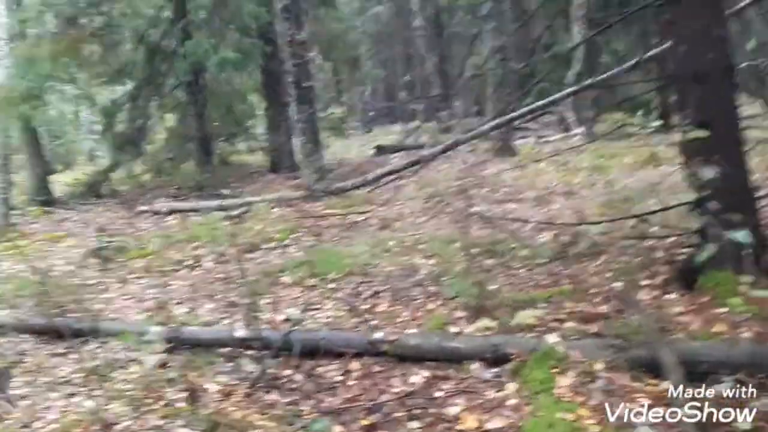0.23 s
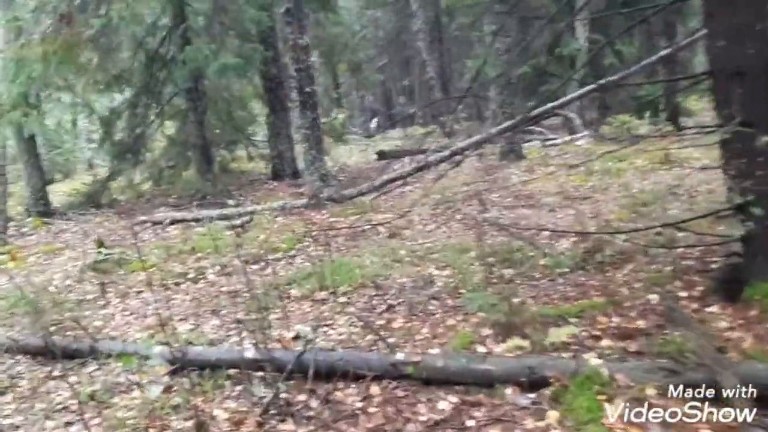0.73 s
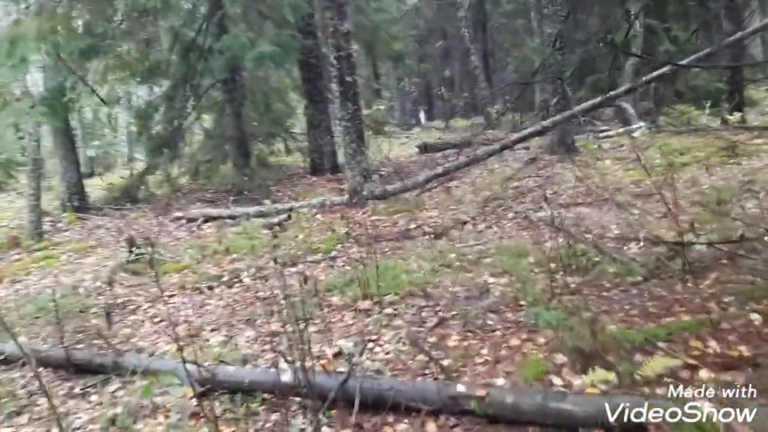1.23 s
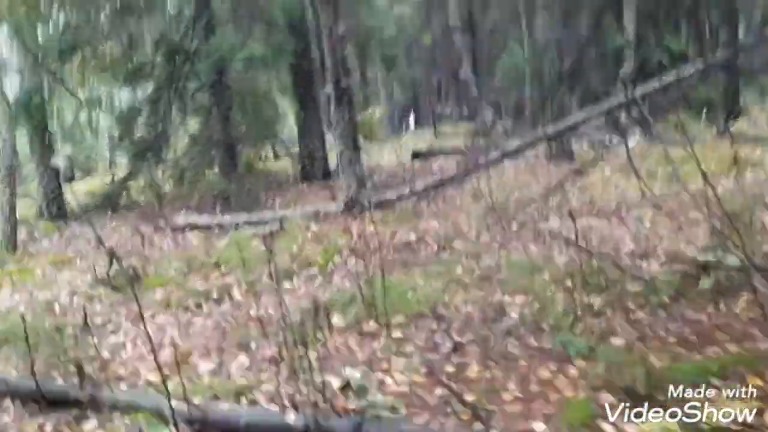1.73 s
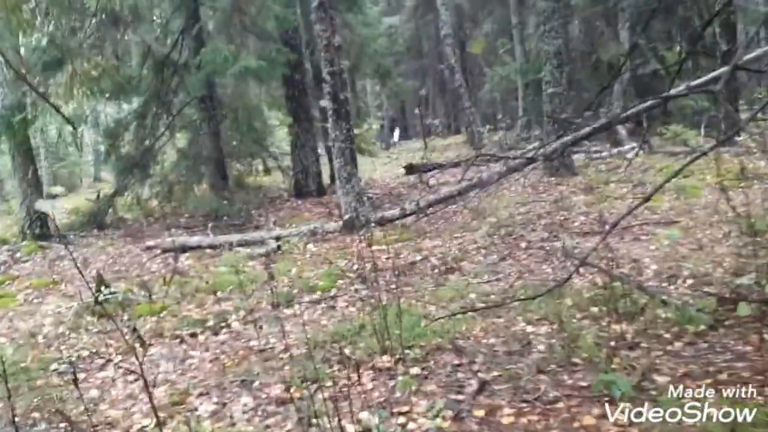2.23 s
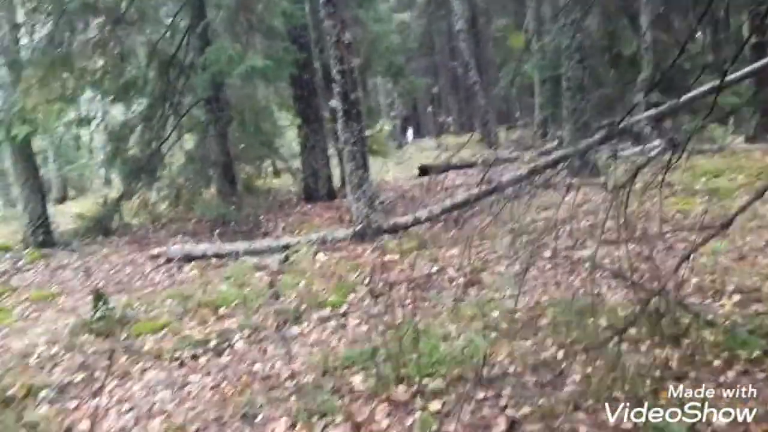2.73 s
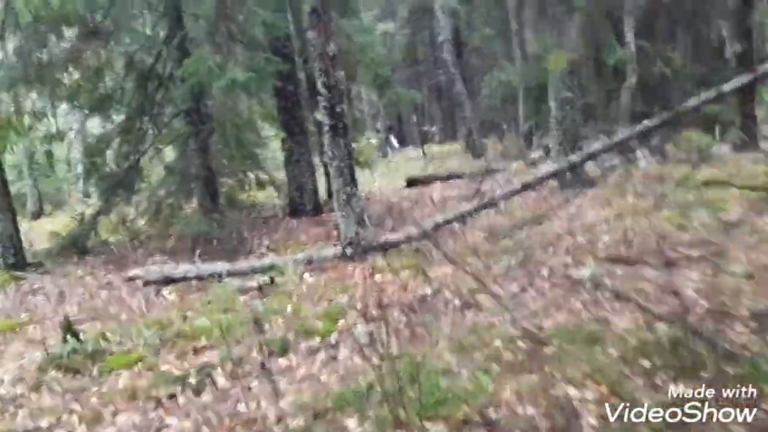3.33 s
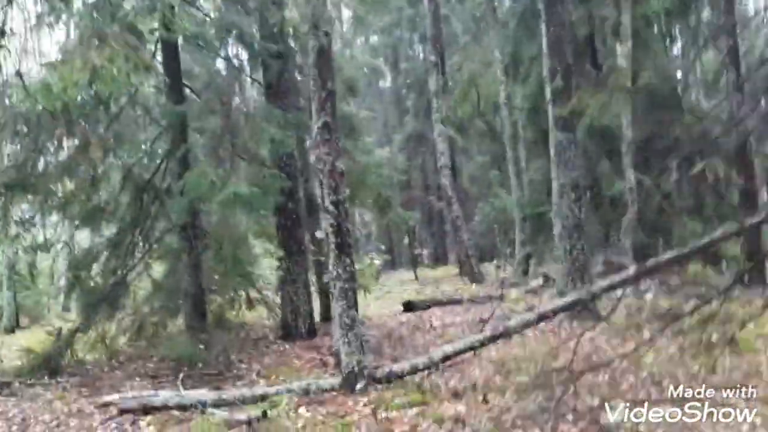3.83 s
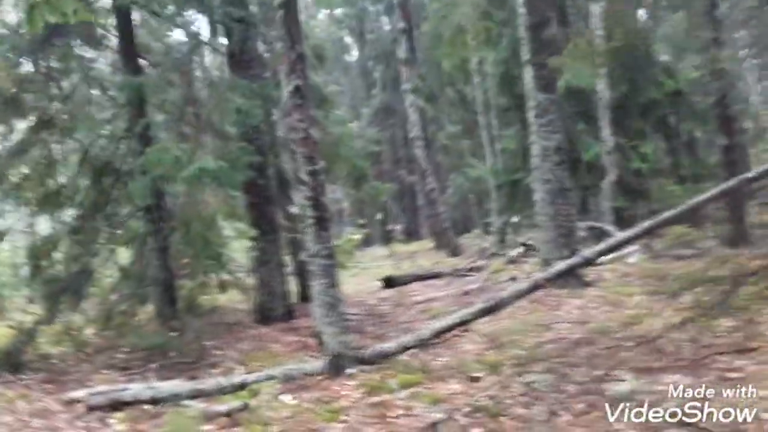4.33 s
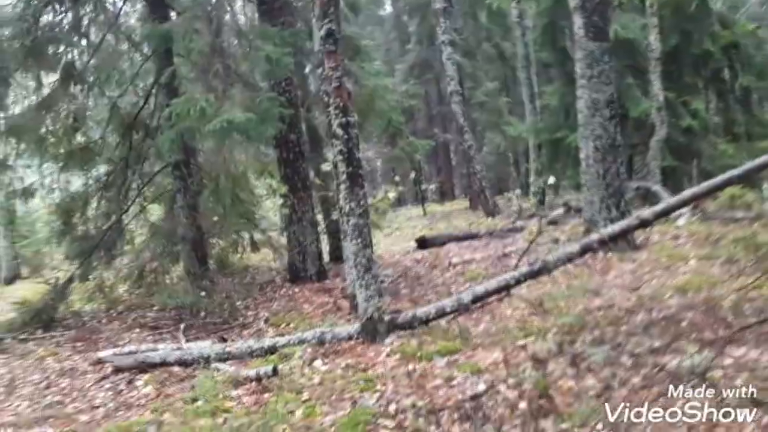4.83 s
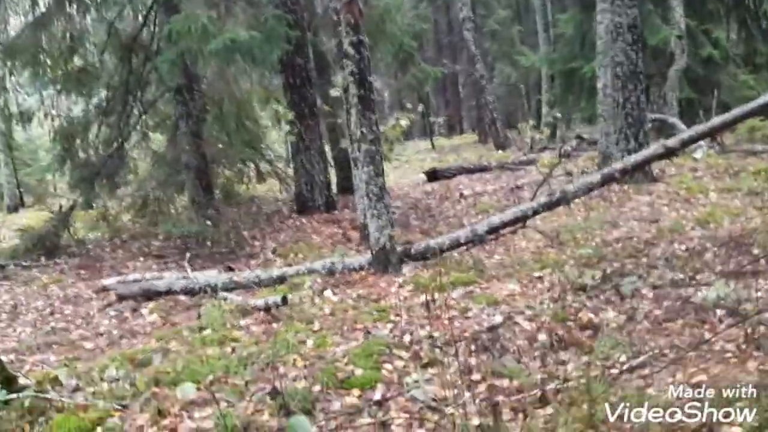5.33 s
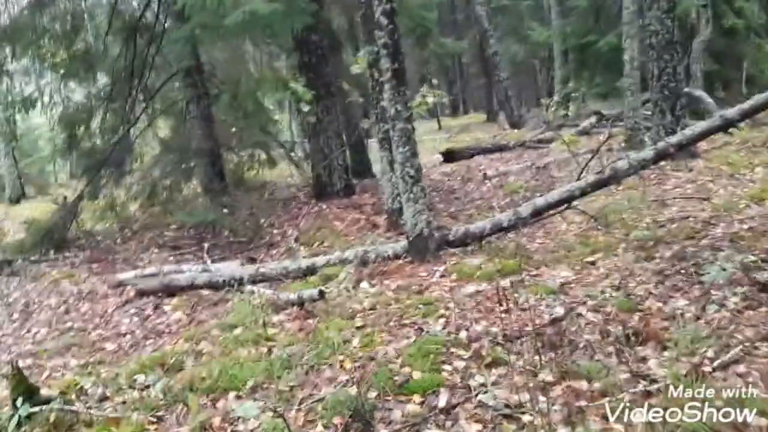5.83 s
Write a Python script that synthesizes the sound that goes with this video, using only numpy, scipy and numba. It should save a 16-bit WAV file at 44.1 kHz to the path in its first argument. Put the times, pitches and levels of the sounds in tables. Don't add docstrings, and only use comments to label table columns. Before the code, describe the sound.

A person walks through dry leaf litter in a still forest, heard close on a handheld stereo phone. A leaf swish and soft air puffs open it, then uneven crunches with snapping twigs, ticking stalks and dull thuds underfoot. It thins near three seconds, a very loud twig crack comes past four, and a heavy rustle swells near the end.

```python
import sys
import numpy as np
from scipy import signal
from scipy.fft import rfft, irfft
from scipy.io import wavfile
from scipy.ndimage import uniform_filter1d, map_coordinates
from numba import njit

SR = 44100
rng = np.random.default_rng(int(sys.argv[2]) if len(sys.argv) > 2 else 0)


def to_linear_factor(level_db):
    exponent = np.asarray(level_db, float) / 20
    return 10 ** exponent


def materialize(psi):
    bounded = np.clip(np.atleast_2d(psi).T, -1, 1)
    quanta = np.round(bounded * 32767).astype(np.int16)
    wavfile.write(sys.argv[1], SR, quanta)


N = 267819

LEAF_HZ = [900, 2500, 6000, 12500]
LEAF_DB = [-4, 1.8, -2.5, 0.4]
LEAF_STEEP = [1.2518, 1.05, 1.0493, 0.95]
# start_s, level_db, fall_s (per 20 dB), tilt_db_per_octave (towards thin leaves)
TREADS = [(0.28, -55.5, .33, -.6), (0.665, -65, 0.2817, -.6), (0.771, -54.5, 0.1265, 2),
          (0.886, -57.5, 0.3077, 1.5), (1.317, -58.5, 0.1645, 1.5), (1.619, -57.5, 0.0833, 2.5),
          (1.7, -54.5, 0.4122, 0.5), (2.367, -72, .1, -1.5), (2.472, -64, 0.2404, 1.5),
          (2.93, -69, .06, 4.5), (2.997, -68, .08, 4), (3.075, -68, .05, 4.5), (3.24, -58.5, .8, 2),
          (4.045, -58, .2, 2.5), (4.115, -59, 0.2981, -3.5), (4.328, -55, .2, 2.5), (5.375, -54, .07, 2)]
# loudest_s, level_db, rise_s, fall_s (both per 20 dB), tilt_db_per_octave
SWEEPS = [(0.02, -57.5, 0.16, .17, -.6), (0.49, -64, .5, .055, -2.5), (1.47, -75, .3, .4, 5),
          (1.056, -59.5, .5, 0.1406, 1.5), (2.2, -63, .45, .09, -1.5), (2.546, -59, 0.1258, 0.2373, 0),
          (2.84, -72, .45, 1.2, 4.5), (3.628, -52.5, 0.2238, 0.3812, 1.5), (3.89, -57, 0.1793, .3, -1.5),
          (3.95, -62, .4, .04, 2.5), (4.262, -54.5, 0.2495, 0.0826, 2), (4.44, -61, 0.7846, .33, .6),
          (4.885, -64, .45, .14, 1.5), (5.19, -63, .13, .45, -.9), (5.32, -60, .15, .3, -2.5),
          (5.54, -49, .2, .25, .8), (5.675, -45.5, .3, .16, -1.2), (5.775, -51, 0.9784, .075, .4),
          (6.01, -58, .08, .9, -1.1)]
# (both per 20 dB, sign ignored)
WEIGHT = [(0.65, -52, .008, .15), (0.944, -58, 0.2591, -0.0222), (1.31, -61, .03, .2),
          (1.69, -49, .12, .18), (1.83, -53, .08, .3), (2.07, -57, .15, .2), (4.85, -70, .5, .2),
          (2.82, -64, .25, 1.5), (3.063, -62, .4, .17), (3.265, -61, .02, .25),
          (3.522, -53, 0.1352, 0.1925), (4.105, -54, .02, .3), (4.414, -56.5, 0.5132, -0.0572),
          (5.735, -48, 0.3291, 0.0578), (.03, -50, .03, .08), (1.49, -71, .1, .1), (3.9, -60, .15, .1),
          (5.38, -62, .2, .3), (6.07, -60, .1, .1)]
# pitch_hz, width_hz, share (0 to 1)
BED_MODES = [(318, 50, 1), (480, 300, .6), (170, 150, .27)]
# loudest_s, level_db, swell_s (rise and fall per 20 dB)
PUFFS = [(0.03, -60.5, 0.1261), (0.104, -45.5, 0.0302), (0.15, -40.5, 0.0315), (0.229, -53, 0.0385),
         (0.66, -68, 0.0274), (0.864, -73, 0.1265), (1.01, -63, .04), (1.131, -46, .018),
         (1.744, -49.5, 0.0737), (1.864, -56, 0.1192), (1.96, -68.5, 0.2106), (2.147, -67.5, 0.0504),
         (1.3, -70, .1), (2.41, -61, .12), (2.685, -75, 0.0287), (3.48, -61, 0.1074), (3.62, -65.5, 0.2794),
         (5.45, -71, .3), (5.7, -64, .15), (5.813, -43, 0.0283), (2.08, -64, .03), (2.65, -70, .03),
         (3.4, -68, .05), (4.52, -77, .05)]
# start_s, peak_db, colour_hz, left_minus_right_db
FLICKS = [(.0144, -38, 14300, 2), (1.0156, -45, 2330, -5), (1.0984, -46, 7920, 1), (1.264, -46, 1500, 0),
          (1.2755, -42, 2370, -2), (1.288, -46, 2500, 0), (1.6207, -42, 12800, 3), (1.6636, -44, 2830, -1),
          (1.669, -42, 13000, 3), (1.6776, -38, 15000, 1), (1.812, -44, 1500, 0), (1.9729, -46, 1500, 0),
          (2.1226, -44, 11000, 5), (2.7891, -44, 12000, 4), (2.866, -52, 13000, 2), (2.8908, -51, 12900, 3),
          (3.5404, -43, 12400, 5), (3.5538, -43, 2030, 0), (3.8856, -41, 2130, -2), (4.117, -40, 1100, 0),
          (4.205, -40, 5000, 2), (4.316, -36, 14000, 2), (4.3854, -40, 13000, 1), (4.4468, -44, 1160, 0),
          (4.5341, -47, 3120, -2), (5.3742, -36, 7950, -5), (5.383, -34, 8000, -5), (5.677, -31, 6000, -4),
          (5.698, -30, 7900, -6), (5.702, -34, 5000, -5), (5.7598, -31, 1500, 0), (5.7603, -34, 9000, 2),
          (.8944, -34, 6800, 0)]
# start_s, peak_db, colour_hz, left_minus_right_db, time_to_peak_s
RIPS = [(.7632, -24, 6000, 0, .0014), (.7638, -25, 12500, 8, .0012), (.7655, -32, 2000, 0, .0015),
        (3.228, -44, 13500, 3, .012), (4.03, -48, 5500, 0, .006), (4.068, -44, 6500, 0, .005),
        (4.211, -40, 6000, 2, .003), (4.2587, -31, 5000, 2, .003), (5.297, -40, 12000, -2, .002),
        (5.361, -34, 5500, -5, .002), (5.44, -42, 5000, -3, .006), (5.741, -35, 7500, -4, .005),
        (5.681, -29, 15000, -8, .006)]
# start_s, peak_db, colour_hz, crack_db, left_minus_right_db
TWIGS = [(0.0272, -30.5, 3166, -5, 8), (0.3055, -31, 5519, -29.5, -19.5), (0.7659, -19, 4893, -1.1, 8),
         (0.859, -26.5, 6136, -4, 0.286), (0.8629, -28.5, 2212, -1.5, 2.5),
         (1.2305, -27, 2306, -25, 0.2911), (1.2975, -15, 4525, -6, 3), (1.3014, -29, 5497, -0.443, 0.2832),
         (1.6822, -17.5, 3200, 4, 9), (1.7048, -20.5, 4971, 5.5, 4), (1.7078, -22, 5520, -17, -5),
         (2.5432, -21.5, 2661, -26, -0.84), (2.71, -24, 3100, -17, 1), (2.7262, -25.5, 2900, -16, -3.5),
         (3.576, -24, 2572, 5, 10), (3.6019, -25.5, 5650, -0.9086, 8), (3.6063, -35, 4940, 11, 9),
         (3.6495, -23, 5840, 4.5, 5.5), (4.2, -25.5, 5237, -3.5, 6), (4.2486, -27.5, 4593, -8, 1.7631),
         (4.2593, -21, 4231, -7.5, 3), (4.3251, -6, 4730, -0.2984, 0.49), (5.7344, -21, 1519, -27, -16),
         (5.7636, -23, 4828, -6.5, 5)]
# start_s, peak_db, colour_hz, left_minus_right_db
STALKS = [(0.383, -41, 1478, -11.5), (0.4038, -34, 927.5, 3), (0.4425, -41, 3082, -4.5),
          (0.4765, -43.5, 1138, 7.5), (0.497, -38.5, 962.6, -2.5), (0.543, -47.5, 1158, -1.8969),
          (0.6466, -42.5, 1021, 2), (0.7104, -36.5, 909.6, 7.5), (0.8356, -34.5, 5833, -0.5),
          (0.8954, -33.5, 6810, -4), (0.901, -29.5, 5850, 0.5), (1.1276, -38.5, 5367, -12),
          (1.2109, -39, 3006, -5.5), (1.2461, -33, 2459, -0.1677), (1.3527, -46.5, 929, 8.5),
          (1.6107, -37.5, 4610, -6.5), (1.6147, -35, 4910, 9.5), (1.91, -34.5, 1637, 2),
          (2.033, -31.5, 4062, 5), (2.523, -43.5, 2660, 2), (2.5658, -31.5, 2279, 0),
          (2.7495, -43, 2760, -5), (3.1385, -49, 2272, 10), (3.463, -35.5, 1804, -15.5),
          (4.301, -39.5, 2856, -8.5), (4.4066, -31.5, 3700, 6.5), (4.4181, -31.5, 2637, 3.5),
          (4.5891, -40, 3133, 8.5), (5.463, -32, 5678, -3), (5.5218, -29, 1787, 0.7655)]
# start_s, peak_db, colour_hz, left_minus_right_db
SPLINTERS = [(0.424, -44, 900, 1.1), (0.4655, -39, 1018, -2.8872), (0.5125, -41, 1300, 3),
             (0.714, -41, 1720, -7), (0.6504, -43, 829, -12.5), (0.939, -30.5, 4128, 9.5),
             (0.9827, -28.5, 2711, 3.5), (1.7926, -35, 4337, 8.5), (2.5022, -35.5, 2560, -3.1826),
             (2.7999, -42.5, 2884, 3.5), (3.066, -42, 5590, -6.5), (3.2413, -36.5, 6054, 5.5),
             (3.449, -35, 4505, 2), (3.6298, -27.5, 6000, 12), (4.1346, -37, 1930, 0.2024),
             (4.1538, -39, 1330, -1.3616), (4.1785, -36.5, 2000, 0.1417), (4.307, -37.5, 2850, 11.5),
             (4.4946, -50, 3230, -9), (5.2648, -38, 2441, -5.5), (5.2975, -31, 3731, -4),
             (5.9011, -44, 5400, 3)]
# start_s, peak_db, pitch_hz
THUDS = [(0.029, -38, 313.4), (0.403, -36, 593.1), (0.482, -35, 633.4), (0.65, -34, 477.8),
         (0.708, -39, 401.4), (0.861, -38, 649.7), (1.301, -39, 355.2), (1.649, -41, 199.3),
         (1.683, -40, 305.2), (1.713, -40.5, 315.1), (1.976, -45, 366.3), (2.394, -47.5, 194.5),
         (3.465, -41, 354), (3.525, -42, 290.2), (3.649, -34.5, 322), (4.106, -35.5, 419.8),
         (4.136, -40, 320), (4.155, -40.5, 316.6), (4.217, -40, 398.6), (4.271, -42.5, 498.8),
         (4.326, -34.5, 358.7), (4.406, -35, 421.3), (5.39, -39.5, 589.7), (5.524, -36.5, 532),
         (5.616, -44, 328.1), (5.667, -38, 445.6), (5.677, -36, 411.5), (5.697, -41.5, 369.5),
         (5.735, -34, 322), (5.761, -34.5, 505.8)]
# start_s, peak_db, pitch_hz
HEELS = [
    (.648, -45, 140),
    (.785, -46, 300),
    (.985, -48, 190),
    (1.3, -50, 130),
    (2.65, -56, 140),
    (1.655, -44, 420),
    (4.118, -41, 480),
]
# start_s, length_s, pitch_hz, level_db
SCUFFS = [
    (0.26, 0.1338, 1022, -63.5),
    (2.075, .14, 1000, -69),
    (2.347, 0.07171, 295, -65),
    (5.353, 0.03432, 7178, -48.5),
    (5.596, .095, 6137, -52),
    (5.683, 0.01863, 14480, -50),
    (5.785, .05, 13500, -59),
]
# time_s, left_lag_samples
FEET = [(0, 3), (.45, 2), (.7, -4), (1.2, 1), (1.7, -4), (2.1, 3), (2.75, 2), (3.28, 13), (3.55, -2),
        (4.05, 5), (4.3, 1), (4.85, -11), (5.05, 13), (5.3, 8), (5.5, 11), (5.73, 16), (6.07, 19)]
# pitch_hz, level_db
LEFT = [(60, 8.5), (650, 5.5), (1000, 8), (1500, 2.5), (2300, 3), (4200, 1.5), (6200, 3.5), (8000, 6.5),
        (9300, -2), (10300, 1.5), (12800, 4), (14800, 4.5), (16000, 0)]
# pitch_hz, level_db
RIGHT = [(60, 7), (650, 4.5), (1000, 7), (1500, 3), (2300, 5.5), (3900, 3.5), (5500, 9.5), (6200, 11),
         (6700, 6), (8500, 6.5), (9900, -3), (12500, 2), (15000, 6), (16000, -20.5)]

TREAD_RISE_S, FLICK_S = .05, .0008
STILL_DB, STILL_TILT = -81, 2.5
BED_HZ, BED_SHARE_DB, BED_OCTAVES, BED_REST_DB = 322, -6, -1.5, -84
THUMP_DB, THUMP_GROWTH = -57, 1.2
CALM_DB = -87
STALK_CRACK_DB, SPLINTER_CRACK_DB = -20, -4.5
WOOD_LEAN = .25
TOP_HZ = 16500
LAG_TOP_HZ = 6800


def ring(hz, width_hz, size):
    f = np.fft.rfftfreq(size, 1 / SR) + 1e-3
    return 1 / (1 + 1j * (f / hz - hz / f) * hz / width_hz)


def through(x, response):
    return irfft(rfft(x) * response, x.shape[-1])


def unit(x):
    return x / np.sqrt(np.mean(x ** 2))


def peak_one(x):
    return x / np.abs(x).max(axis=1, keepdims=True)


def walk(rate):
    hold = int(SR / rate)
    steps = np.repeat(rng.standard_normal(N // hold + 1), hold)
    return 1.3 * uniform_filter1d(uniform_filter1d(steps, hold), hold)[:N]


def late(x, lag):
    return map_coordinates(x, [np.arange(N) - lag], order=3, mode="nearest")


def place(s, sounds):
    out = np.zeros(N + sounds.shape[1])
    for start, one in zip((s[:, 0] * SR).astype(int), sounds):
        out[start:start + len(one)] += one
    return out[:N]


def swells(t, s, db, rise, fall, rest_db):
    tick = np.arange(0, N / SR + .002, .001)[:, None]
    gone = np.where(tick < s, (s - tick) / np.abs(rise), (tick - s) / np.abs(fall))
    power = np.sum(to_linear_factor(db - 20 * gone) ** 2, axis=1) + to_linear_factor(rest_db) ** 2
    return np.interp(t, tick[:, 0], np.sqrt(power))


def pressure(t, octaves, steep, rest_db):
    treads = [(s, db, TREAD_RISE_S, fall, tilt) for s, db, fall, tilt in TREADS]
    s, db, rise, fall, tilt = np.transpose(treads + SWEEPS)
    return swells(t, s, db + tilt * octaves, rise / steep, fall / steep, rest_db)


def crackle(count):
    when, chance = rng.random((count, 2)).T
    ticks = np.zeros(N)
    ticks[(when * N).astype(int)] = to_linear_factor(-4.0 * np.log(1 - .99 * chance))
    dying = signal.lfilter([1], [1, -np.exp(-1 / (0.003365 * SR))], ticks)
    return unit(.5 + unit(dying))


@njit
def add(out, start, hz, cycles, size):
    for k in range(len(hz)):
        turn = np.exp((2j * np.pi - 1 / cycles[k]) * hz[k] / SR)
        z = size[k] + 0j
        for i in range(start[k], min(start[k] + int(6 * cycles[k] * SR / hz[k]), len(out))):
            out[i] += z.imag
            z *= turn


def swarm(hz, count):
    when, spread, shape, chance = rng.random((count, 4)).T
    out = np.zeros(N)
    size = to_linear_factor(-3.2 * np.log(1 - .995 * chance)) * np.sign(shape - .5)
    grain_hz = np.minimum(hz * 2 ** (0.6159 * (spread - .5)), .44 * SR)
    add(out, (when * N).astype(np.int64), grain_hz, 1.79 + 0.548 * shape, size)
    return unit(out)


def leaves(t, lag):
    out, stir, breaks = np.zeros((2, N)), walk(40), crackle(count=1500)
    for hz in 690 * 2 ** np.arange(0, 4.6, .5):
        thickness = np.interp(np.log(hz), np.log(LEAF_HZ), np.arange(4))
        share_db = np.interp(thickness, np.arange(4), LEAF_DB)
        steep = np.interp(thickness, np.arange(4), LEAF_STEEP)
        octaves = np.log2(hz / 3400)
        level = pressure(t, octaves, steep, STILL_DB + STILL_TILT * octaves)
        gate = breaks ** (2600 / (hz + 1500))
        band = ring(hz, 0.6787 * hz, N) ** 2
        grains = swarm(hz, count=int(4 * hz ** .9))
        near = unit(through(0.95 * grains + 0.55 * gate * rng.standard_normal(N), band))
        far = unit(through(gate * rng.standard_normal((2, N)), band))
        both = np.array([late(near, lag * (hz < LAG_TOP_HZ)), near])
        patchy_db = 2.6 * walk(35)
        out += level * to_linear_factor(share_db - 10.0 + 0.9 * stir + patchy_db) * (both + 1.2419 * far)
    return signal.sosfilt(signal.ellip(10, .2, 60, 15800, fs=SR, output="sos"), out)


def bed(t):
    noise = rng.standard_normal((3, N))
    push = noise[0] + 0.45 * noise[1:]
    main, *broad = (share * np.abs(ring(hz, width_hz, N)) ** 2 for hz, width_hz, share in BED_MODES)
    wavering_hz = BED_HZ * 2 ** (0.088 * walk(16))
    hum = np.cos(2 * np.pi * np.cumsum(wavering_hz) / SR) * to_linear_factor(3.644 * walk(30))
    weight = swells(t, *np.transpose(WEIGHT), BED_REST_DB)
    rub = to_linear_factor(BED_SHARE_DB) * pressure(t, BED_OCTAVES, steep=1.1424, rest_db=-85)
    thump = weight * np.minimum(weight / to_linear_factor(THUMP_DB), 1) ** THUMP_GROWTH
    note = unit(through(push, main))
    haze = unit(through(crackle(count=600) * push, sum(broad)))
    humming = (0.65 * note + 0.2 * hum) * np.hypot(weight, .45 * rub)
    return (humming + 0.8 * haze * np.hypot(thump, rub)) * to_linear_factor(-6.5)


def puffs(t):
    swing = np.cos(2 * np.pi * np.cumsum(84 * 2 ** (.2 * walk(12))) / SR)
    rumble = unit(through(rng.standard_normal((2, N)), ring(70, 95, N) ** 2 * ring(200, 3000, N) ** 2))
    right = 0.9 * swing + .65 * rumble[1]
    left = .18 * rumble[0]
    s, db, width = np.transpose(PUFFS)
    return np.array([left, right]) * swells(t, s, db, width, width, CALM_DB)


def rips(lag, size=4096):
    rows = RIPS + [(*row, FLICK_S) for row in FLICKS]
    s, db, hz, pan_db, peak_s = np.array(rows).T[:, :, None]
    age = np.arange(size) / SR / peak_s
    grit = rng.standard_normal((len(s), 3, size))
    ports = []
    for sign in (1, -1):
        burst = (grit[:, 0] + .8 * grit[:, sign]) * age * np.exp(-age)
        burst = peak_one(through(burst, ring(hz, .6 * hz, size) ** 2))
        ports.append(place(s, to_linear_factor(db - 4.0 + sign * pan_db / 2) * burst))
    left, right = ports
    top_cut = signal.ellip(10, .2, 60, 15900, fs=SR, output="sos")
    return signal.sosfilt(top_cut, [late(left, lag), right])


def snaps(lag, size=4096):
    stalks = [(*row[:3], STALK_CRACK_DB, row[3]) for row in STALKS]
    splinters = [(*row[:3], SPLINTER_CRACK_DB, row[3]) for row in SPLINTERS]
    s, db, hz, crack_db, pan_db = np.array(TWIGS + stalks + splinters).T[:, :, None]
    age = np.arange(size) / SR
    chance = rng.standard_normal((len(s), 3, size))
    detour_s = 0.00022958 + 0.00037806 * rng.random((len(s), 3))
    thin = (1 - ring(40, 355.2, size)) ** 2
    stalk = ring(hz, 1.307 * hz, size) * ring(hz / 2, 2 * hz, size) + 0.37 * ring(1300, 1002, size)
    lean = np.where(np.arange(len(s))[:, None] < len(TWIGS), WOOD_LEAN, 1)
    scatter = 0.09308 * np.exp(-age / 0.0041694) + 0.00789 * np.exp(-age / 0.0217)
    scatter = scatter * np.minimum(age / 0.0001, 1)
    out = []
    for side, sign in enumerate((1, -1)):
        own = chance[:, side + 1]
        fibres = (chance[:, 0] + 0.6246 * own) * age / 0.0002279 * np.exp(-age / 0.00025964)
        fibres[:, 12] += 1.1
        delay_s = detour_s[:, :1] + 0.2074 * detour_s[:, side + 1, None]
        bounce = np.exp(-2j * np.pi * np.fft.rfftfreq(size, 1 / SR) * delay_s)
        blow = through(fibres, 1 + 0.33 * bounce) + own * scatter
        wood = peak_one(through(blow, thin * stalk))
        crack = peak_one(through(blow, ring(11639, 5267, size) ** 2))
        wood = place(s - .0004, to_linear_factor(db - 0.5 + sign * lean * pan_db / 2) * wood)
        crack = place(s - .0004, to_linear_factor(db + crack_db - 0.5 + sign * pan_db / 2) * crack)
        out.append((wood if side else late(wood, lag)) + crack)
    return np.array(out)


def thuds(table, size=2048):
    s, db, hz = np.array(table).T[:, :, None]
    age = np.arange(size) / SR
    push = (1 + 2.2986 * rng.standard_normal((len(s), size))) * np.exp(-age / 0.000088)
    body = ring(hz, 0.35783 * hz, size) * ring(hz, 3.707 * hz, size)
    knock = through(push, body + 0.1035 * ring(BED_HZ, 79.2, size) ** 2)
    return place(s - .0012, to_linear_factor(db - 4.5) * peak_one(knock)) * to_linear_factor(np.array([[.8], [-.8]]))


def scuffs(t):
    out, grit = np.zeros((2, N)), crackle(count=2500)
    for s, length, hz, db in SCUFFS:
        drag = np.clip((t - s) / 0.004026, 0, 1) * np.clip((s + length - t) / 0.01368, 0, 1)
        rub = rng.standard_normal(N) + .5 * rng.standard_normal((2, N))
        out += to_linear_factor(db) * drag * unit(through(grit * rub, ring(hz, 0.4103 * hz, N) ** 2))
    return out


def scene():
    t = np.arange(N) / SR
    lag = np.interp(t, *np.transpose(FEET))
    litter = leaves(t, lag) + bed(t) + rips(lag) + scuffs(t)
    breaks = snaps(lag) + thuds(THUDS) + thuds(HEELS)
    return litter + puffs(t) + breaks


def port(table):
    hz, db = np.transpose(table)
    bins = np.log(np.fft.rfftfreq(1024, 1 / SR) + 1)
    c = irfft(np.log(to_linear_factor(np.interp(bins, np.log(hz), db))))
    c[1:512] = 2 * c[1:512]
    c[513:] = 0
    return irfft(np.exp(rfft(c)))[:512]


def band_limit(x):
    return signal.sosfilt(signal.butter(12, 16980, fs=SR, output="sos"), x)


def record(dry):
    left, right = (signal.lfilter(port(colour), 1, x) for colour, x in zip((LEFT, RIGHT), dry))
    narrow = 1 - .3 * (np.fft.rfftfreq(N, 1 / SR) > LAG_TOP_HZ)
    side = through((left - right) / 2, narrow)
    heard = (left + right) / 2 + np.array([side, -side])
    heard = np.tanh(heard)
    heard = signal.sosfilt(signal.ellip(8, .2, 80, TOP_HZ, fs=SR, output="sos"), heard)
    return band_limit(heard)


dry = scene()
out = record(dry)
materialize(out)
```